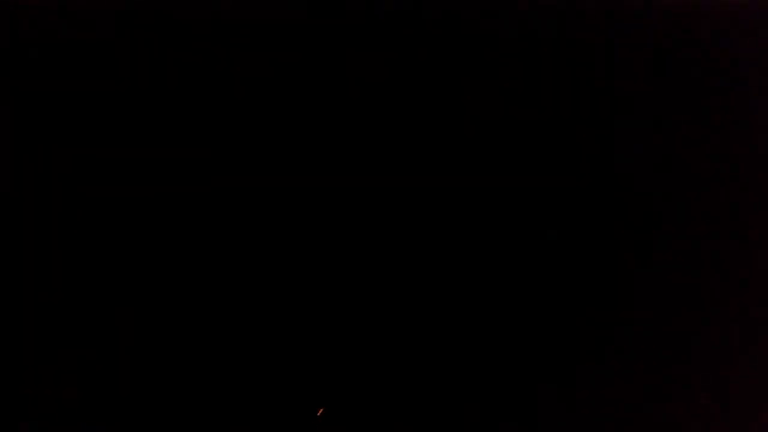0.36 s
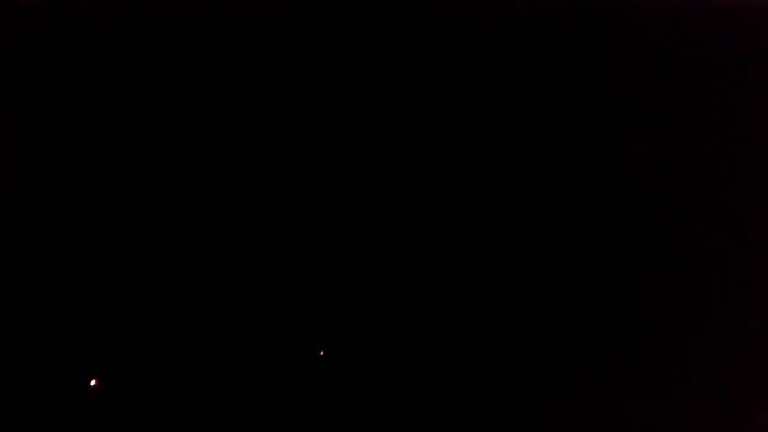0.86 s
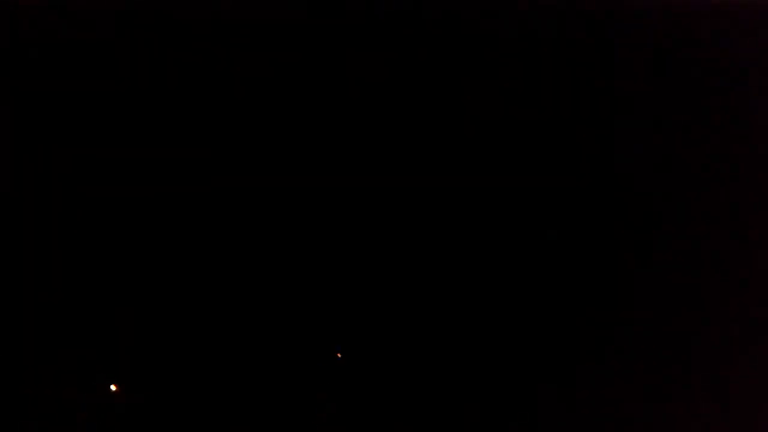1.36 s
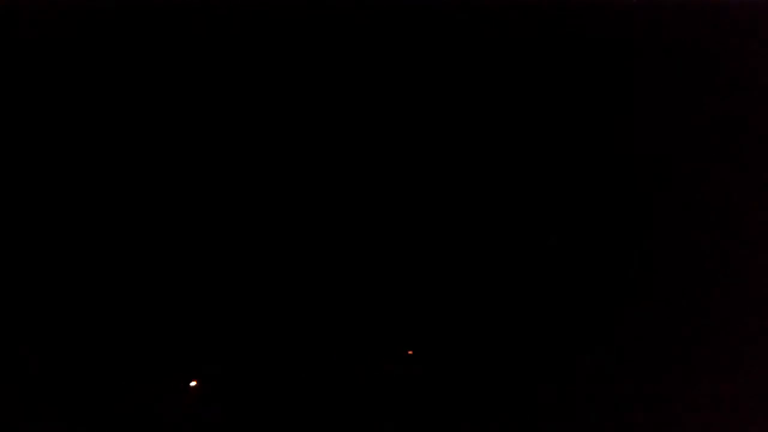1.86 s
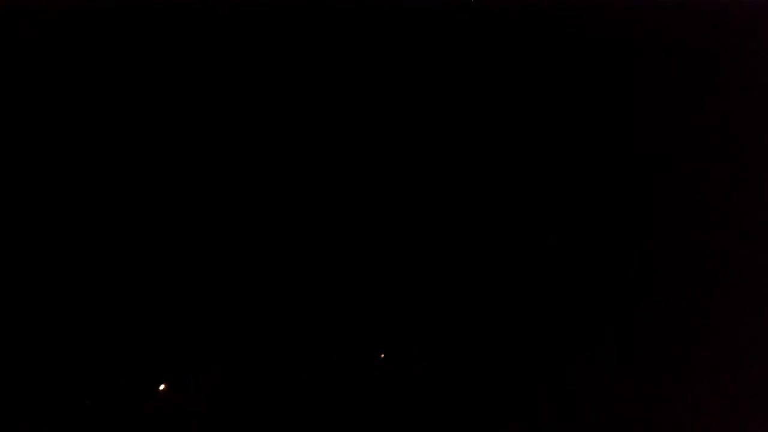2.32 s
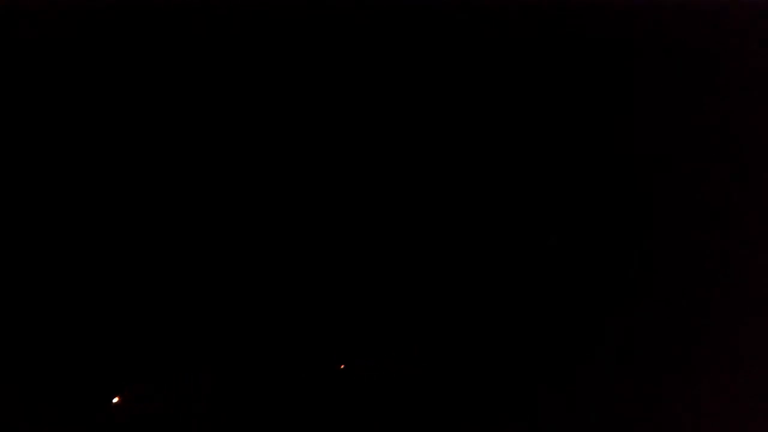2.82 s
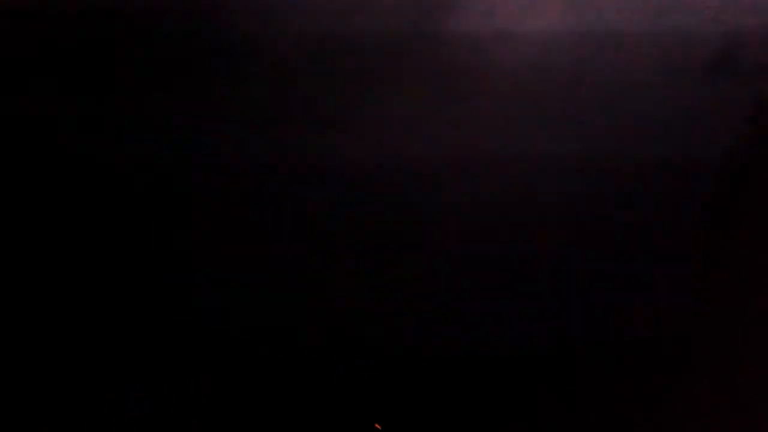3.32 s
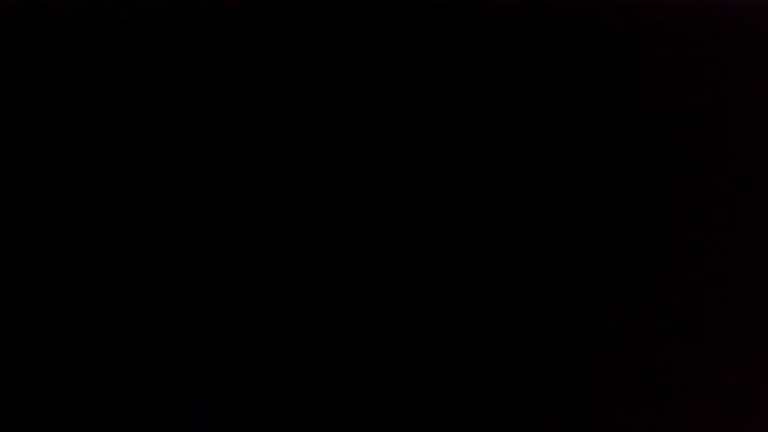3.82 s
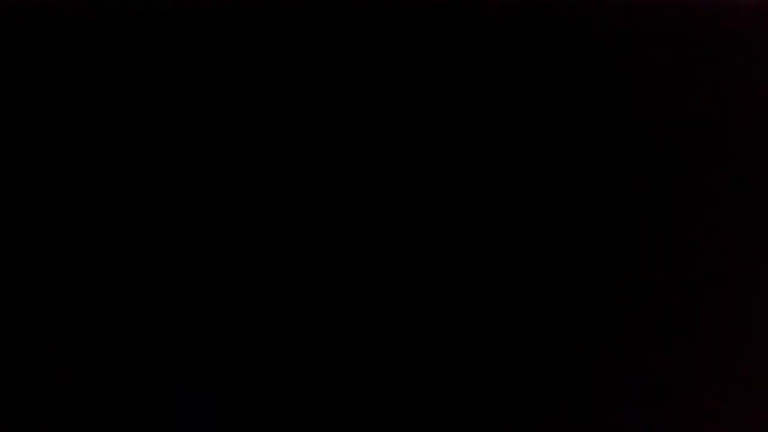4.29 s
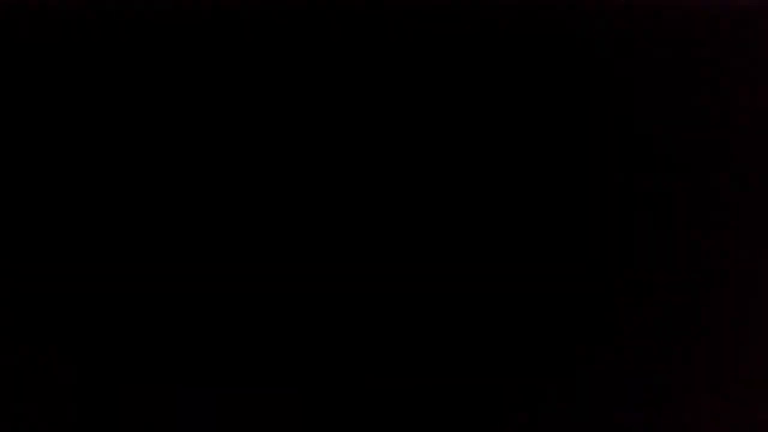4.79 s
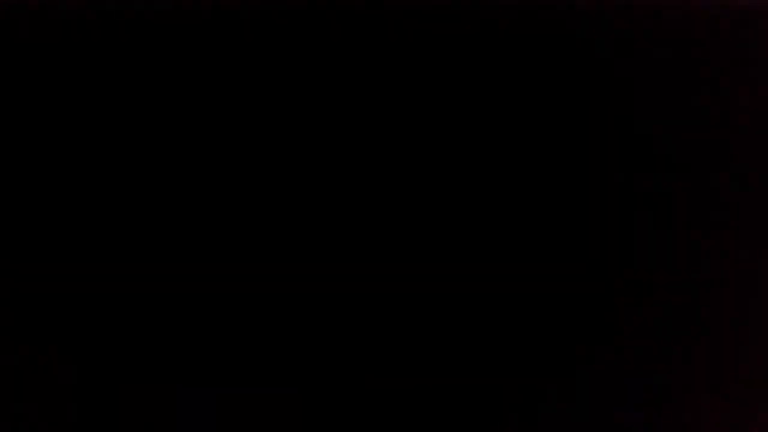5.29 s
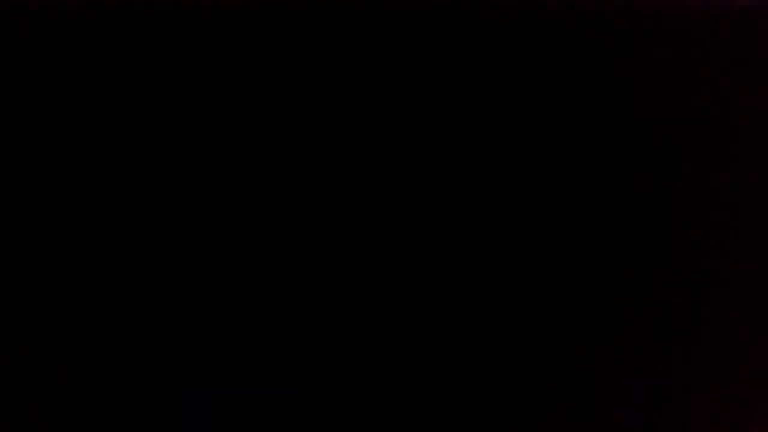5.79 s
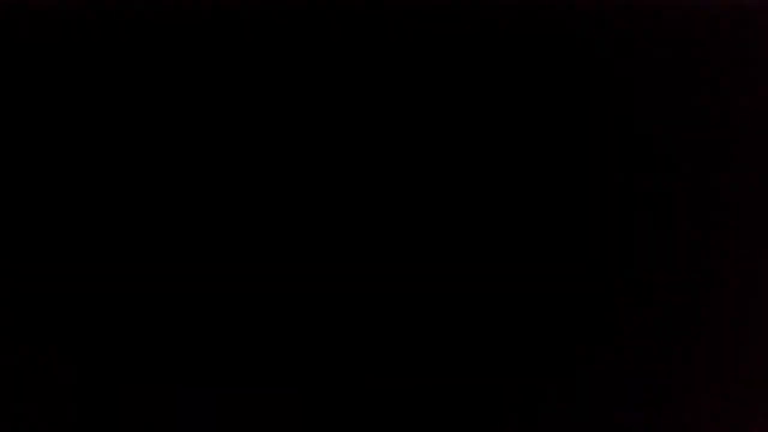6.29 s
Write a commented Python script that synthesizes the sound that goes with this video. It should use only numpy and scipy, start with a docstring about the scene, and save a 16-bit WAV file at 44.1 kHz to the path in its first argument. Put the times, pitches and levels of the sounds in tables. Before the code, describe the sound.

Low thunder mutters at night, then a sudden loud overloaded roll of deep booms that dies away, with bush crickets buzzing high and steady.

```python
"""Outdoors on a summer night: a far mutter of thunder, then a loud roll of booms that overloads the microphone
and dies away. The roll is dense random shocks in four colours; each boom is a short burst of a few low tones.
Two bush crickets buzz in throbs above it: dense clicks through a coloured band with narrow peaks, swelling
once a stroke. A third kind gives short high chirps of band-passed noise, over a faint hiss and a thin whine."""
import sys
import numpy as np
from scipy import signal
from scipy.fft import rfft, irfft
from scipy.io import wavfile
from scipy.ndimage import uniform_filter1d

SR = 44100
rng = np.random.default_rng(int(sys.argv[2]) if len(sys.argv) > 2 else 0)


def invert_db(level):
    """Linear amplitude ratio for a level in decibels (20 dB per decade), elementwise."""
    return 10 ** (np.asarray(level, dtype=float) / 20)


def log_audio(samples):
    """Write samples as a 16-bit WAV file to the path given in sys.argv[1]."""
    # one column per channel
    frames = np.atleast_2d(samples).T
    # limit to full scale, then quantise
    limited = np.clip(frames, -1, 1)
    pcm = np.round(limited * 32767).astype(np.int16)
    wavfile.write(sys.argv[1], SR, pcm)


N = 292907
T = np.arange(N) / SR


def evened(x):
    """Scales to rms 1."""
    return x / np.sqrt(np.mean(x ** 2) + 1e-20)


def coloured(x, points, peaks=(), lift_db=0):
    """Gives x the spectrum of a (Hz, dB) table plus narrow peaks, at rms 1."""
    f, db = np.transpose(points)
    hz = np.fft.rfftfreq(len(x), 1 / SR)
    gain = invert_db(np.interp(np.log(hz + 1), np.log(f + 1), db, -90, -90))
    for centre, width, peak_db in peaks:
        gain += invert_db(peak_db + lift_db) / (1 + (2 * (hz - centre) / width) ** 2)
    return evened(irfft(rfft(x) * gain, len(x)))


def clicks(per_s, spread_db):
    """Random impulses of either sign, most small and a few large."""
    size = invert_db(spread_db * np.minimum(rng.exponential(1, N), 4))
    sign = rng.choice([-1., 1.], N)
    return size * sign * (rng.random(N) < per_s / SR)


def add(mix, s, sound):
    """Lays a sound into the mix with its middle at s."""
    start = max(round(s * SR) - len(sound) // 2, 0)
    part = mix[start:][:len(sound)]
    part += sound[:len(part)]


# Colour of the night hiss. Each row: frequency in Hz, gain in dB.
HISS_COLOUR = [(300, -13.5), (900, -1), (2500, -3), (5000, -4), (6500, -3.5), (11000, -4.5), (13000, -6.5),
               (16500, 1.5)]


def night():
    """Background at the microphone: noise coloured as a faint hiss, and one steady sine as the thin whine."""
    hiss_db, whine_db, whine_hz = -56, -67, 12000  # rms levels
    hiss = invert_db(hiss_db) * coloured(rng.standard_normal(N), HISS_COLOUR)
    whine = invert_db(whine_db) * np.sqrt(2) * np.sin(2 * np.pi * whine_hz * T)
    return hiss + whine


# High chirps. Each row: time of the last stroke in seconds, its level in dB (as the peak of an equal sine),
# number of strokes, pitch in Hz that the band is set around.
CHIRPS = [(.167, -43, 2, 12600), (.275, -38, 3, 12200), (.293, -43, 1, 12500), (.81, -45, 3, 12700),
          (.974, -46, 2, 12400), (1.199, -47, 2, 13000), (1.257, -43, 2, 12700), (1.56, -48, 2, 12700),
          (1.95, -34.5, 3, 12700), (2.198, -47, 2, 12700), (2.792, -43.5, 2, 13200),
          (2.833, -37.5, 2, 12950), (4.359, -38, 2, 12900), (4.623, -52, 4, 12900), (5.18, -42, 2, 13500),
          (5.438, -43.5, 4, 11400), (5.826, -40, 3, 12800), (6.629, -38, 3, 12400)]


def chirps():
    """Short raspy strokes of band-passed noise, each louder than the one before."""
    gap_s, length_s, swell_db = .017, .02, 4
    out = np.zeros(N)
    t = np.arange(round(length_s * SR)) / SR
    shape = np.sin(np.pi * t / length_s) ** .85
    for s, db, strokes, hz in CHIRPS:
        band = signal.butter(2, [hz - 550, hz + 800], "band", fs=SR)
        for k in range(round(strokes)):  # from the last stroke backwards
            rasp = evened(signal.lfilter(*band, rng.standard_normal(len(t))))
            level = invert_db(db - k * swell_db) * np.sqrt(.5)
            add(out, s - k * gap_s - .003, level * rasp * shape)
    return out


def buzz(song, colour, peaks, sharp, rest):
    """Each wing stroke scrapes a file of teeth: dense clicks that swell and fade once a stroke."""
    strokes_per_s = 29.5
    s, db, ahead = np.transpose(song)
    turns = strokes_per_s * T + np.interp(T, s, ahead)
    stroke = rest + np.exp(sharp * (np.cos(2 * np.pi * turns) - 1))
    teeth = coloured(clicks(9000, 1.0), colour, peaks, lift_db=1.5)
    return invert_db(np.interp(T, s, db)) * evened(stroke) * teeth


# Song of the steady cricket. Each row: time in seconds, level in dB, strokes ahead of an even beat.
STEADY_SONG = [(0, -50.5, 0.46), (.5, -46, 0.36), (1.2, -50.5, 0.45), (2.3, -53.5, 0.38), (3.1, -54, .74),
               (3.9, -53, 0.72), (4.5, -51.5, 1), (5.15, -46.5, 1.73), (6.1, -52.5, 1.74),
               (6.64, -58, 2.86)]
# Broad colour of its buzz. Each row: frequency in Hz, gain in dB.
STEADY_COLOUR = [(3880, -48), (6600, -18), (6970, -21), (7190, -16), (7390, -2), (7910, 0), (8100, -3),
                 (8740, -7), (8840, -9), (9150, -9), (10200, -11), (11100, -15), (11800, -10), (13000, -19)]
# Narrow peaks that give its buzz a tonal edge. Each row: frequency in Hz, width in Hz,
# height in dB before the buzz lifts them all.
STEADY_PEAKS = [(7660, 160, 0), (7960, 37, -3), (8200, 76, -3), (8420, 50, -3), (9070, 88, -7),
                (9490, 60, -8), (10100, 42, -10), (10400, 48, -11)]


def steady_cricket():
    """The cricket that never pauses: its scraping throbs distinctly with each stroke."""
    return buzz(STEADY_SONG, STEADY_COLOUR, STEADY_PEAKS, sharp=2.4, rest=.34)


# Phrases of the near cricket. Each row: start in seconds, end in seconds, full level in dB,
# strokes ahead of the beat at the start, strokes of lag gathered by the end.
NEAR_PHRASES = [(-2.1, .15, -44, .42, .05), (.3, 5.165, -43.5, .01, 1.4), (5.3, 7.5, -45, -1.55, .1)]


def near_song():
    """Level and timing of the phrases: a soft start, a steady hold, a slowing end."""
    swell_s, swell_db, stop_s = .8, -13, .04
    rest_db = -54  # a faint scraping stays under and between the phrases
    tire, drag = 9, .2  # a share of the lag gathers evenly, the rest steeply near the end
    s = np.arange(0, N / SR + .01, .005)
    level, ahead = invert_db(rest_db) + 0 * s, 0 * s
    for start, end, db, lead, lag in NEAR_PHRASES:
        rise = invert_db(db + swell_db * np.clip(1 - (s - start) / swell_s, 0, 1))
        stop = np.clip((end - s) / stop_s + .5, 0, 1)
        level = level + rise * (s >= start) * stop
        done = np.clip((s - start) / (end - start), 0, 1)
        late = lag * (drag * done + (1 - drag) * done ** tire)
        ahead = np.where(s >= start, lead - late, ahead)
    return np.transpose([s, 20 * np.log10(level), ahead])


# Broad colour of the near cricket's buzz. Each row: frequency in Hz, gain in dB.
NEAR_COLOUR = [(3710, -52.5), (6300, -22), (7120, -4.5), (8470, 3), (10300, -2), (10600, -9), (10800, -2.5),
               (12300, -19), (12600, -8), (16400, -51.5), (22000, -120)]
# Narrow peaks that give its buzz a tonal edge. Each row: frequency in Hz, width in Hz,
# height in dB before the buzz lifts them all.
NEAR_PEAKS = [(7360, 25, -5), (7750, 170, -3), (8010, 110, 0), (8530, 32, -2), (8740, 58, 0),
              (9000, 72, -3), (9500, 72, -1), (10200, 130, -3), (10500, 46, -8)]


def near_cricket():
    """The near cricket sings in phrases: its scraping swells broadly with each stroke."""
    return buzz(near_song(), NEAR_COLOUR, NEAR_PEAKS, sharp=.39, rest=.027)


def flicker(x, depth_db=2.0):
    """Random level flicker laid over x in narrow patches of its spectrum."""
    z = signal.stft(x, nperseg=1024, noverlap=768)[2]
    patches = rng.standard_normal(z.shape[::-1]).T
    patches = uniform_filter1d(patches, size=3, axis=0)  # across frequency
    patches = evened(uniform_filter1d(patches, size=9, axis=1))  # along time
    gain = evened(invert_db(depth_db * patches))
    return signal.istft(z * gain, nperseg=1024, noverlap=768)[1][:N]


def halo():
    """How thickly shocks crowd in with each boom: they rise with it and trail after it."""
    out = np.zeros(N)
    for s, db, _, length, _ in BOOMS:
        span = .052 + 1.6 * length  # seconds
        u = np.arange(round(span * SR)) / (span * SR)
        add(out, s - length + span / 2, invert_db(db) * np.sin(np.pi * u ** .46) ** 2)
    return out


# The roll under the booms. Each row: time in seconds, rumble in dB, deep part in dB, middle part in dB,
# crackle in dB over the middle part; rumble and middle are before the shocks round the booms add to them.
ROLL = [(0, -39.5, -46, -52.5, -24), (.3, -40.5, -45.5, -51, -23), (.8, -40, -43, -49.5, -19),
        (1.3, -45.5, -52.5, -53, -22), (1.46, -42.5, -43.5, -48, -26), (1.5, -34, -35, -42, -26.5),
        (1.75, -36.5, -44, -47.5, -27), (2.35, -40, -45, -44, -23.5), (2.6, -42, -50, -47.5, -13.5),
        (2.92, -40, -45.5, -41.5, -10), (2.94, -25.5, -34, -29, -19), (3.28, -28, -51.5, -33, -10.5),
        (3.4, -21.5, -46, -26.5, -13.5), (3.539, -31.5, -39, -27, -15.5), (3.661, -27.5, -34, -30.5, -13),
        (3.799, -18.5, -30, -26, -14), (4.07, -21, -46.5, -28, -13), (4.33, -25, -36, -26.5, -14),
        (4.6, -32, -47, -34.5, -13), (4.801, -33.5, -38.5, -35, -10.5), (4.92, -21.5, -28.5, -26.5, -12),
        (5.06, -28, -36, -33.5, -11.5), (5.15, -26.5, -34, -31, -11), (5.209, -35.5, -43.5, -38, -11),
        (5.6, -42.5, -48, -45, -9), (5.66, -34.5, -42, -40, -15), (5.86, -34, -51, -44, -11),
        (5.92, -42, -52, -46, -13), (6.1, -44.5, -54, -45, -14.5), (6.45, -46.5, -57, -51, -11),
        (6.56, -41, -50, -45.5, -11), (6.64, -49.5, -60, -43, -16)]
# Colours of its four parts; ground echoes notch the crackle. Each row: frequency in Hz, gain in dB.
RUMBLE = [(44, -54), (75, -21.5), (97, 3), (135, 6), (242, 2), (301, -3), (330, -13), (430, -54),
          (730, -120)]
DEEP = [(8.8, -62), (15, -15), (59, -6), (75, -2), (98, -32), (160, -120)]
MIDDLE = [(190, -3.5), (330, -5), (356, -0.5), (527, -11), (594, -12), (640, -13.5), (830, -49.5),
          (1410, -120)]
CRACKLE = [(380, -26.5), (640, -5.5), (705, 0.5), (768, 2.5), (873, -2), (1180, -0.5), (1320, -11.5),
           (1550, -7.5), (2300, -40), (2990, -78), (5060, -120)]


def roll():
    """Shocks from every kink of the long channel arrive scattered in time; distance shifts their balance."""
    s, *parts_db = np.transpose(ROLL)
    rumble, deep, middle, crackle = (invert_db(np.interp(T, s, db)) for db in parts_db)
    crowd = halo()
    rumble = rumble + invert_db(-20) * crowd
    middle = middle + invert_db(-23) * crowd
    shocks = clicks(900, 1.5) + .43 * rng.standard_normal(N)
    out = rumble * coloured(shocks, RUMBLE)
    out += deep * coloured(shocks, DEEP)
    out += middle * coloured(shocks, MIDDLE)
    out += middle * crackle * coloured(shocks, CRACKLE)
    return out


# Steps in the waveform, heard as a click. Each row: time in seconds, height in dB before a slight rounding.
STEPS = [(4.8338, -26), (4.8397, -12), (4.8425, -27)]


def step_click():
    """Sudden steps in the waveform that sink back within a few milliseconds, slightly past zero."""
    out, fade_s = np.zeros(N), .0013
    for s, db in STEPS:
        u = np.maximum(T - s, 0) / fade_s
        out += invert_db(db) * (T >= s) * (1 - .4 * u) * np.exp(-.6 * u)
    return signal.lfilter([.5], [1, -.5], out)  # rounds the edge


# The booms that stand out. Each row: time of the middle in seconds, level in dB (as the peak of an equal sine),
# main tone in Hz, length in seconds at half height, undertone in dB over the main tone.
BOOMS = [(0.167, -32, 121, 0.0168, 2), (1.347, -31.5, 236, 0.013, -23), (1.489, -36.5, 182, 0.026, -10),
         (1.525, -28, 126, 0.041, 14), (1.645, -28, 147, 0.017, -5), (1.681, -33, 209.5, 0.023, -15),
         (1.751, -32, 157, 0.0089, 4), (1.925, -26, 126, 0.029, 14), (2.259, -29.5, 188, 0.02, 5),
         (2.937, -15.5, 178, 0.0165, -29), (2.956, -17.5, 214.4, 0.025, -24),
         (2.99, -5.5, 197.7, 0.019, -20), (3.004, -9, 234.7, 0.022, -4), (3.049, -14.5, 234, 0.013, -7),
         (3.089, -7.5, 187, 0.018, -37), (3.138, -12.5, 236.6, 0.023, -0.5),
         (3.421, -15, 223.5, 0.013, -18), (3.49, -18, 218, 0.0223, -30), (3.573, -8.5, 176, 0.028, -8),
         (3.623, -14, 171, 0.015, -4), (3.696, -11.5, 170, 0.033, -9), (3.858, -6, 183, 0.011, -2.5),
         (3.911, -11.5, 213.6, 0.06, -1), (3.989, -8, 173, 0.014, 0), (4.035, -5.5, 209, 0.028, -0.5),
         (4.152, -13, 184.6, 0.044, -0.5), (4.218, -14, 167, 0.02, 14), (4.34, -20, 158, 0.046, 0),
         (4.443, -23.5, 209.4, 0.041, -10), (4.635, -11, 175, 0.027, -6), (4.75, -15, 171.6, 0.024, -18),
         (4.896, -16, 198, 0.01255, -8), (4.943, -9.5, 144, 0.021, 25), (4.987, -31.5, 157, 0.046, 14),
         (5.127, -16.5, 180, 0.016, 8), (5.311, -34, 188, 0.0256, -17), (5.688, -22.5, 211, 0.0107, -20),
         (5.811, -21.5, 180, 0.0097, -19), (6.01, -25.5, 204, 0.01066, -12), (6.567, -32.5, 186, 0.0172, 4)]


def booms():
    """A stretch of channel side-on to the ear arrives at once: a few cycles, over- and undertone, some crackle."""
    out = np.zeros(N)
    grit = coloured(rng.standard_normal(N), CRACKLE)
    for s, db, hz, length, under_db in BOOMS:
        a, b, c, d = rng.random(4)  # phases, and the chance in the pitches
        t = np.arange(round(2 * length * SR)) / SR
        core = np.sin(2 * np.pi * (hz * t + a))
        core += .5 * np.sin(2 * np.pi * (hz * (1.45 + .4 * c) * t + b))
        core += invert_db(under_db) * np.sin(2 * np.pi * (hz * (.5 + .201 * d) * t + c))
        core += invert_db(-29.5) * grit[round(d * (N - len(t))):][:len(t)]
        add(out, s, invert_db(db) * np.sqrt(.5) * evened(core) * np.hanning(len(t)))
    return out


def scene():
    """Night, crickets and thunder summed into one channel; all but the thunder and the click flickers."""
    treble = flicker(night() + chirps() + steady_cricket() + near_cricket())
    return (treble + roll() + step_click() + booms())[None]


def suppress_faint(x, wide_db=-76, slope=.33, narrow_db=-85.5):
    """Bands faint beside the loudness of the moment drop out: the louder the thunder, the more is lost."""
    z = signal.stft(x, nperseg=2048, noverlap=1024, window="cosine")[2]
    power = abs(z) ** 2
    wide, narrow = (10 * np.log10(uniform_filter1d(power, size=n, axis=1) + 1e-20) for n in (20, 5))
    loud_db = 10 * np.log10(power.sum(1, keepdims=True) + 1e-20)
    keep_wide = wide > wide_db + slope * loud_db
    keep_narrow = narrow > narrow_db + .15 * loud_db  # narrow dips vanish even in quiet
    kept = z * keep_wide * keep_narrow
    return signal.istft(kept, nperseg=2048, noverlap=1024, window="cosine")[1][:, :N]


def low_pass(x):
    """Removes everything above the highest recorded frequency."""
    return signal.sosfilt(signal.butter(12, 15680, fs=SR, output="sos"), x)


def record(dry):
    """Faint bands drop out and the loudest peaks bend into the microphone's ceiling."""
    ceiling, knee = .708, 12  # share of full scale; higher knee = harder bend
    x = suppress_faint(dry) / ceiling
    mix = ceiling * x / (1 + abs(x) ** knee) ** (1 / knee)
    return low_pass(mix)


dry = scene()
out = record(dry)
log_audio(out)
```